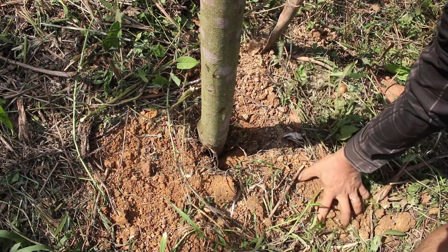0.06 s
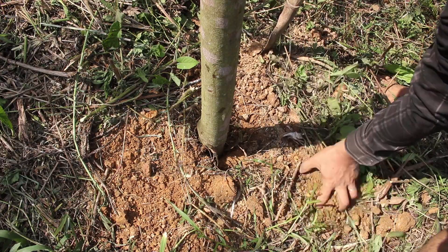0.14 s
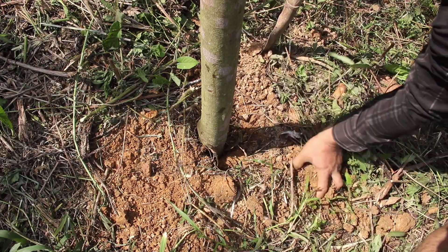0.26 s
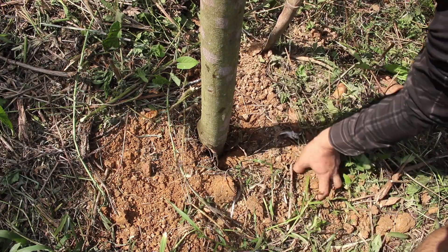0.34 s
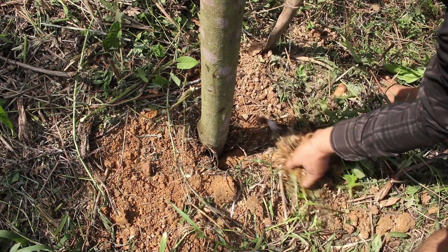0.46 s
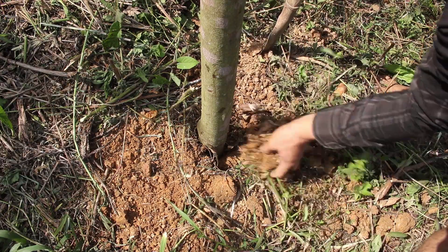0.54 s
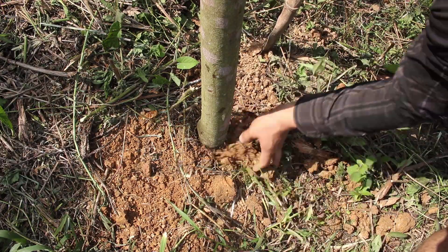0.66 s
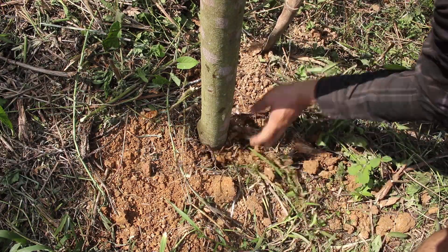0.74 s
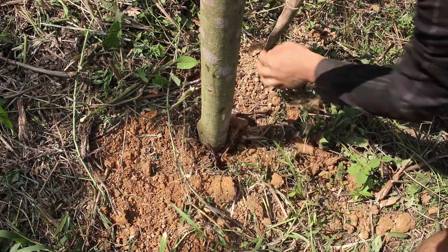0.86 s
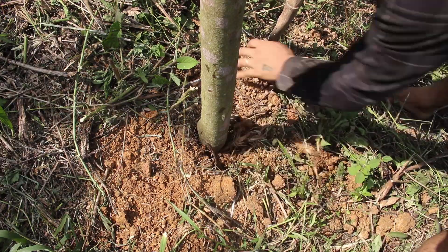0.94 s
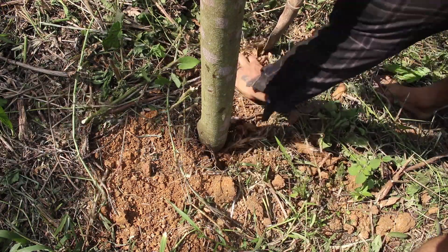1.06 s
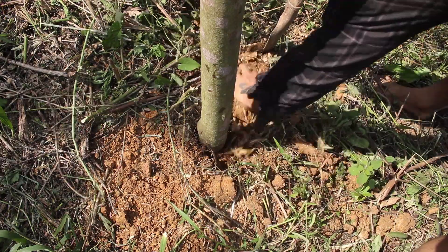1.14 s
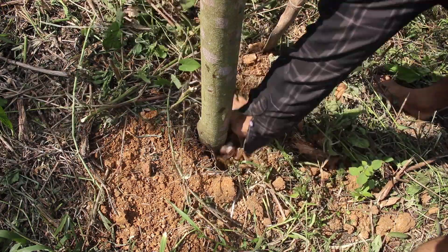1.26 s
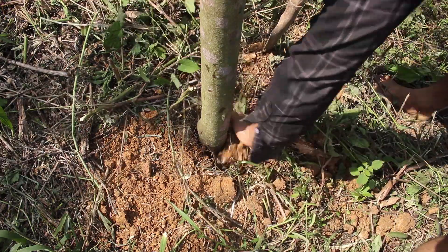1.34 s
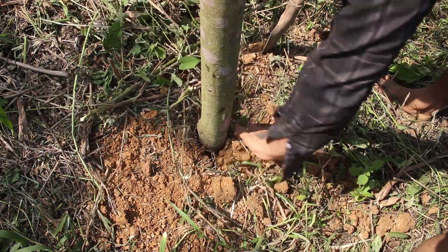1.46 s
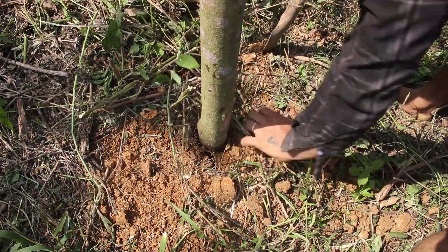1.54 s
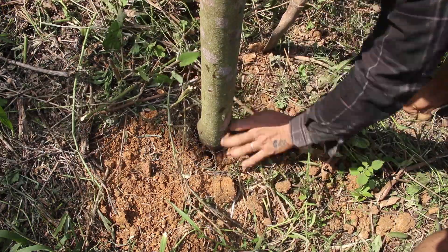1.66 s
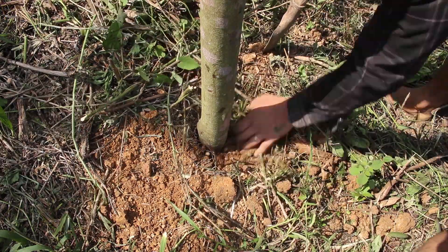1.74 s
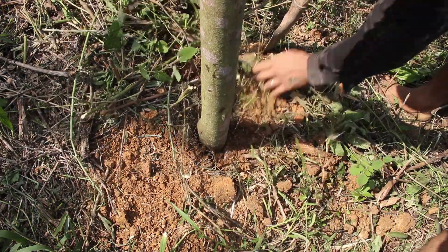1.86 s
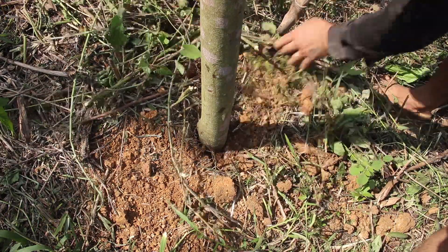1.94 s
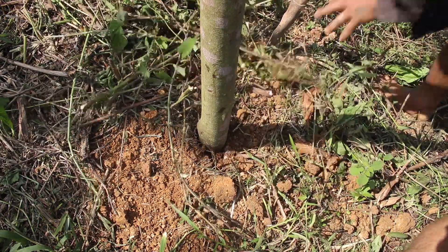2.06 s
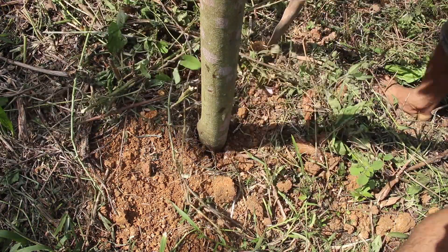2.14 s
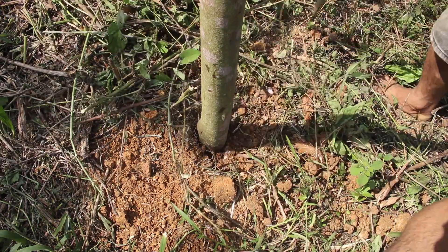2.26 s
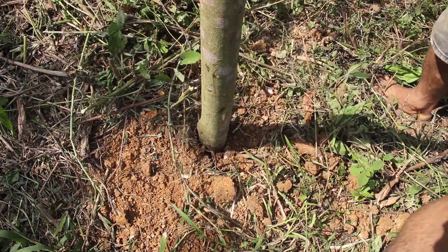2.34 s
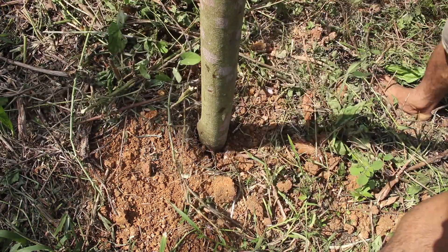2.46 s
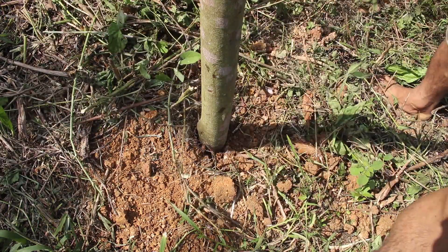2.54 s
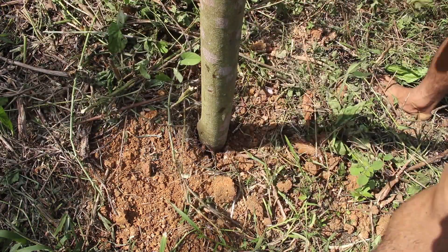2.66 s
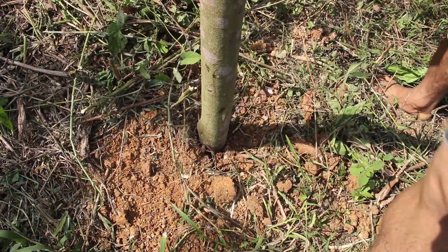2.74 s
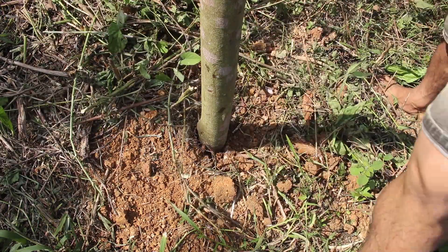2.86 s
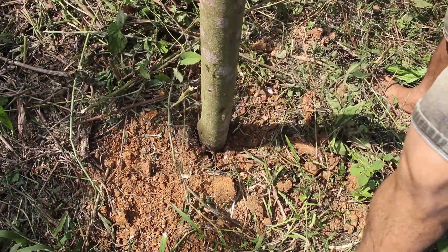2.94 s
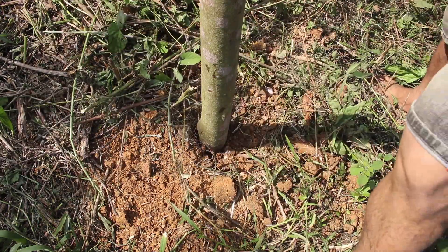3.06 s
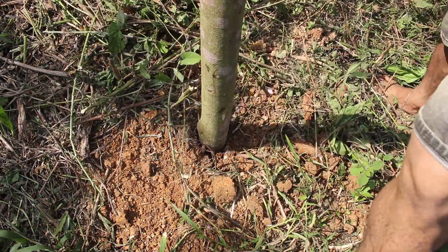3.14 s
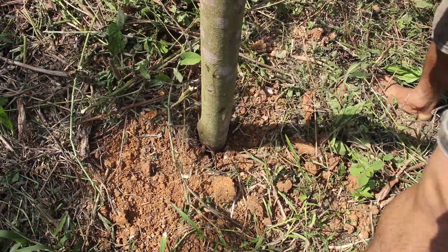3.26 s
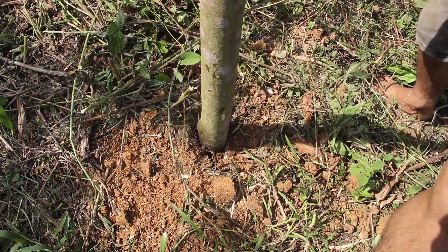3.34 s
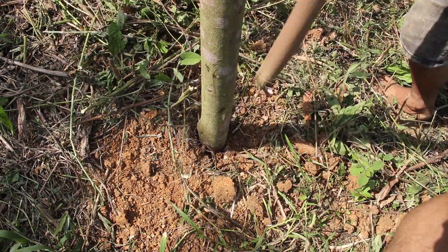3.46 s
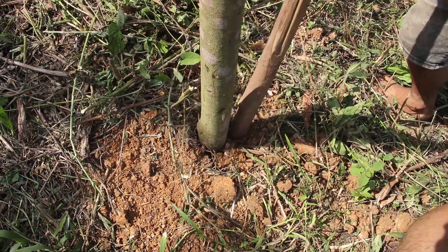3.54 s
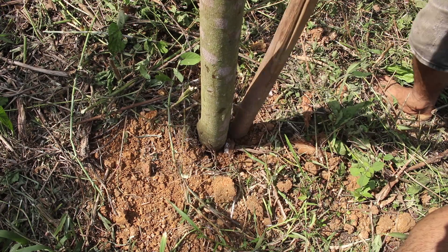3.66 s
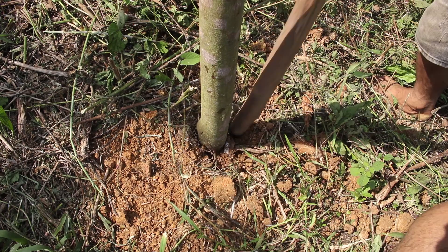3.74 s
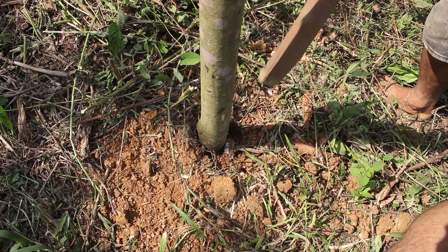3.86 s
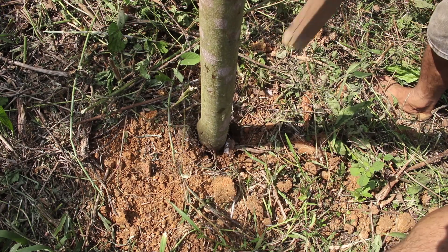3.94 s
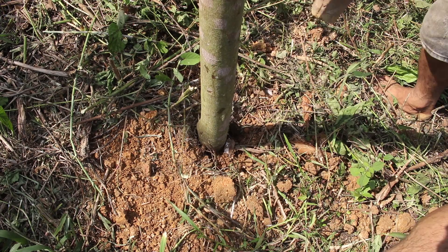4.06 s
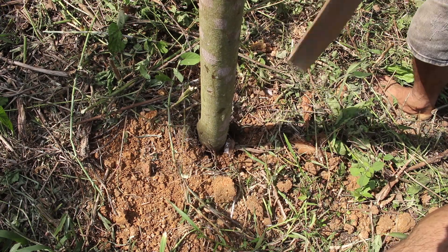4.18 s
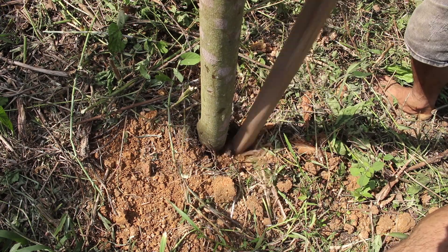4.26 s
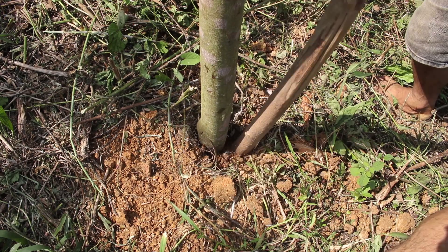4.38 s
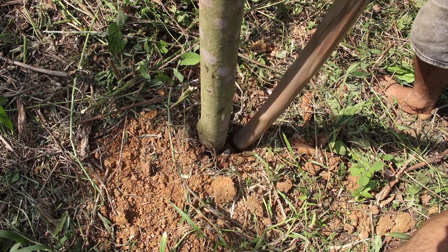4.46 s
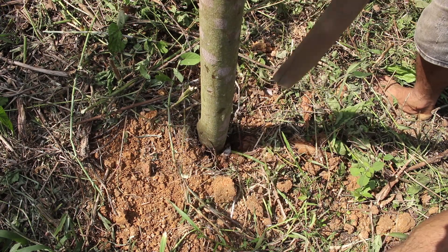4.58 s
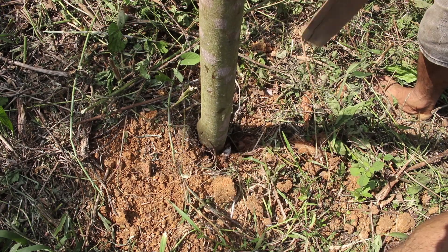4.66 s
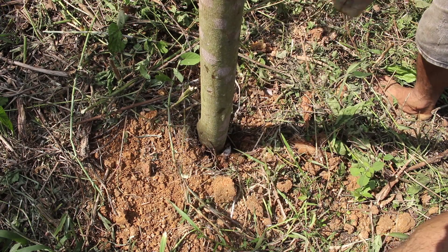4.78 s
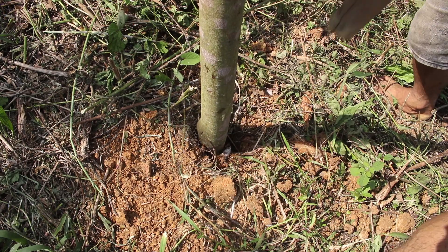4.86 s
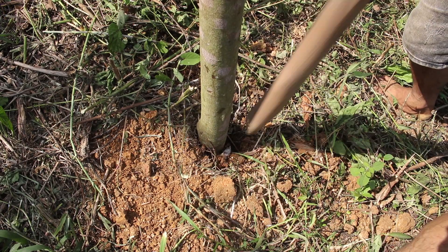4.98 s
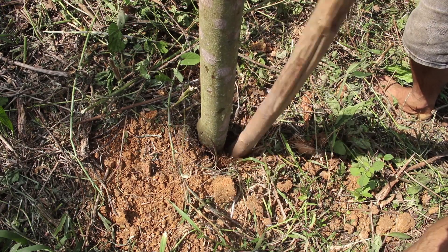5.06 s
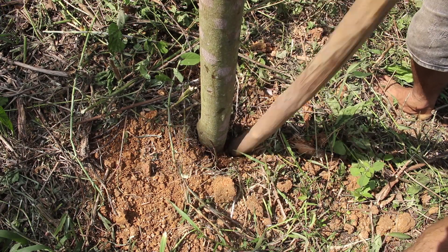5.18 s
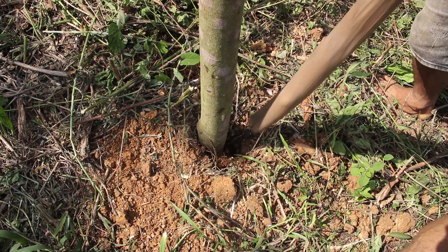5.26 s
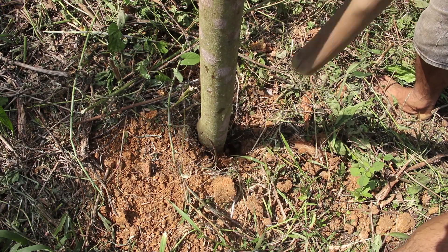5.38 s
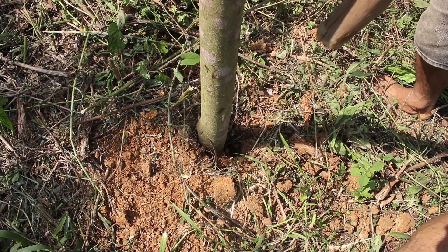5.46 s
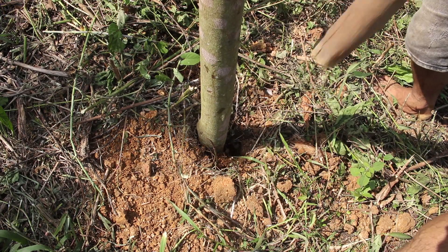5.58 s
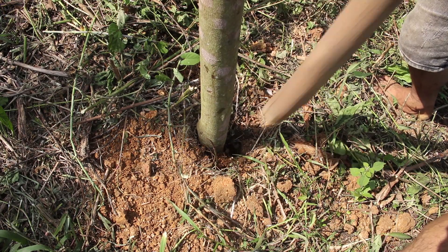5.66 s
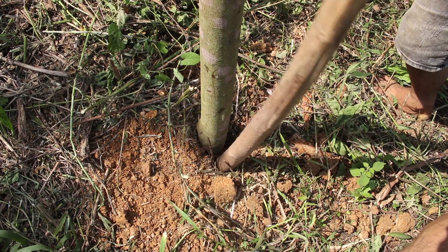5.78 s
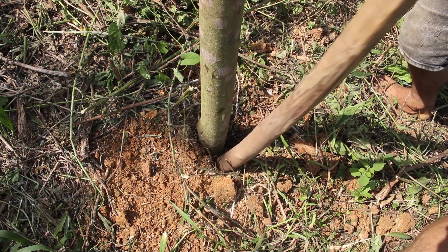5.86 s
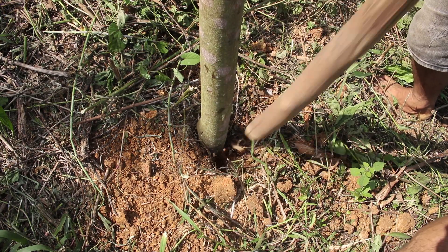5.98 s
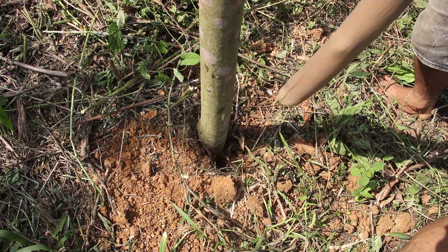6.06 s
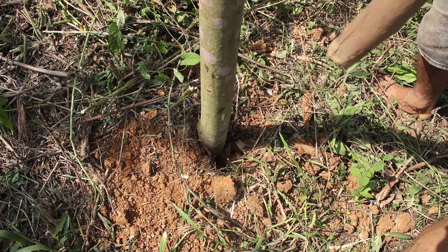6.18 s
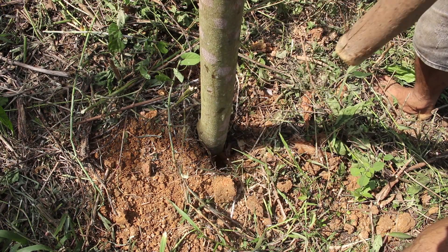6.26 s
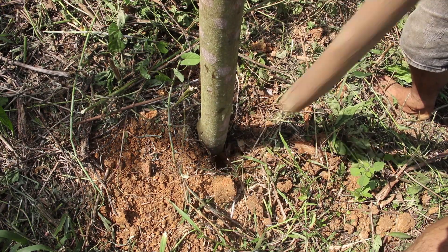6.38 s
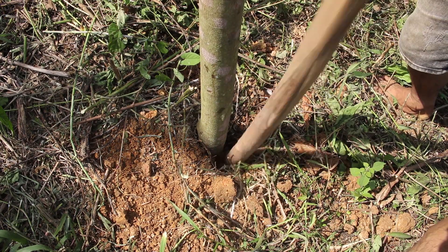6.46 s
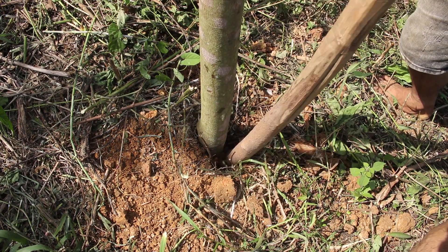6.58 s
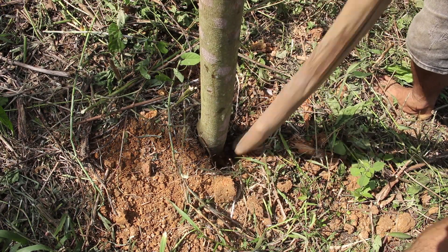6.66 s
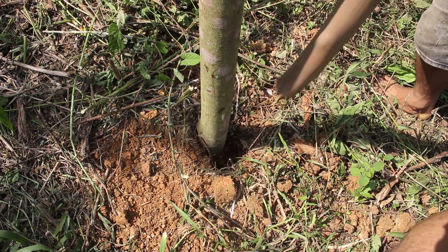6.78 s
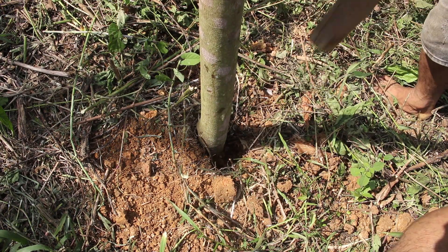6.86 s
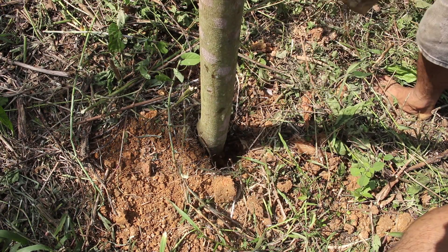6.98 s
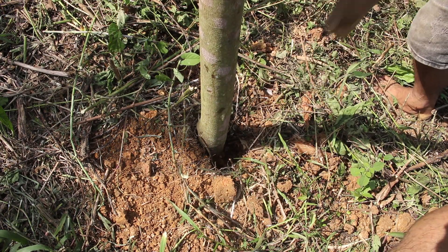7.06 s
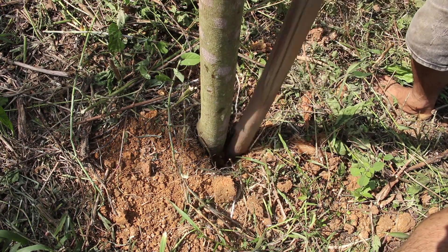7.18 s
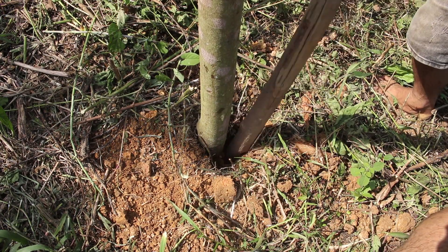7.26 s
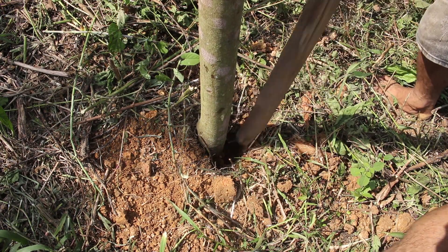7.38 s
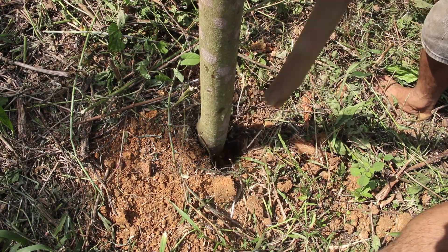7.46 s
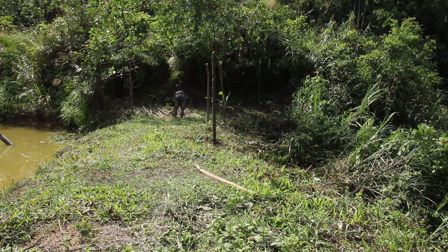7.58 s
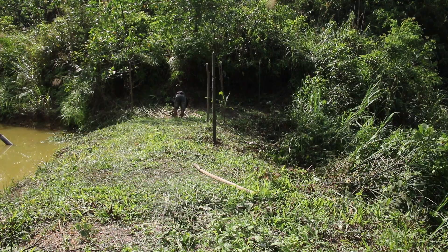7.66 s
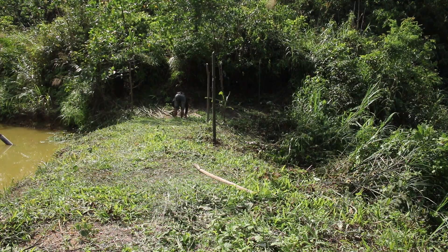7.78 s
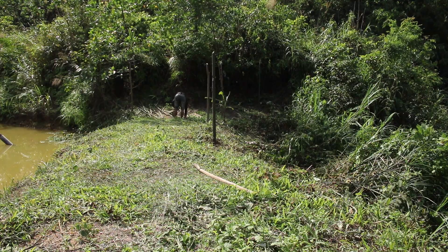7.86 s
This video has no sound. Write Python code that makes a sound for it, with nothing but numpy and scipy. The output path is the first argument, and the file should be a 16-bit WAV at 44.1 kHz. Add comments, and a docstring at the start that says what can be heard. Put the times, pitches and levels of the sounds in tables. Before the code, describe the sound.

Hands brush loose soil around a post, then a wooden pole rams the earth six times with gritty thuds, outdoors in light wind.

```python
"""A hand brushes loose soil round a post; clods and dry stalks snap, and a loose stick is knocked at 2.5 s.
A wooden pole is picked up and, from 3.6 s, rammed into the earth six times. Each blow crushes grit,
rings the pole and sends a slow thud through the ground; crumbs trickle as the pole is drawn out.
The stick is tapped once more at 7.6 s. Light wind and the hush of a field lie under it all."""
import sys
import numpy as np
from scipy import signal
from scipy.fft import rfft, irfft, next_fast_len
from scipy.io import wavfile
from scipy.ndimage import uniform_filter1d

SR = 44100
rng = np.random.default_rng(int(sys.argv[2]) if len(sys.argv) > 2 else 0)


def to_wav(sig):
    """Store sig (one row per channel, or 1-D mono) as 16-bit WAV at the path in sys.argv[1].

    Samples outside -1..1 are clipped; the rate is SR.
    """
    pcm = np.clip(np.atleast_2d(sig), -1, 1) * 32767
    pcm = np.round(pcm).astype(np.int16)
    wavfile.write(sys.argv[1], SR, pcm.T)  # frames by channels


N = 349712
HOP = 32  # samples per step of the soil envelopes

# pole blows: entry t/s, crush/s, rising share, grit/dB, grit tilt/dB, entry to peak strain/s, pole/dB,
# pole tilt/(dB/oct), scuff/dB, entry to stop/s, earth ring/dB, knock/dB, thud/dB, hum/dB
BLOWS = [(3.597, 0.025, 0.58, -36, 3, 0.01, -29.5, -4, -72.5, .013, -31, -24, -35, -39.5),
         (4.354, 0.029, 0.15, -37, 2.5, 0.011, -33.5, -1.5, -72, .019, -31.5, -31.5, -37.5, -46.5),
         (5.111, 0.025, 0.35, -35.5, 4, 0.0054, -23, -8.5, -64.5, 0.012, -20, -14.5, -31.5, -37),
         (5.816, 0.026, 0.47, -32.5, -0.5, 0.007, -26, -8, -62, .015, -21.5, -26.5, -35, -38),
         (6.548, 0.019, 0.82, -37.5, 1, 0.0096, -23.5, -5, -65, 0.01098, -29, -21.5, -30.5, -34.5),
         (7.271, 0.015, 0.4, -40, 8.5, 0.008, -24.5, -7, -61.5, 0.0095, -23, -32, -28.5, -36)]


def gain_of(db):
    return 10 ** (np.asarray(db) / 20)


def unit_rms(x):
    return x / np.sqrt(np.mean(x ** 2) + 1e-20)


def add(mix, start_s, sound):
    part = mix[round(start_s * SR):][:len(sound)]
    part += sound[:len(part)]


def coloured(x, spectrum):
    """Filters x by a spectrum of (f/Hz, level/dB)."""
    f, db = np.transpose(spectrum)
    size = next_fast_len(len(x) + 2048)
    hz = np.fft.rfftfreq(size, 1 / SR)
    response = gain_of(np.interp(np.log(hz + 1), np.log(f + 1), db))
    return irfft(rfft(x, size) * response, size)[:len(x)]


def noise(size, spectrum):
    return unit_rms(coloured(rng.standard_normal(size), spectrum))


def flutter(depth_db, window):
    """Random gain, smoothed over window samples."""
    return gain_of(depth_db * unit_rms(uniform_filter1d(rng.standard_normal(N), window)))


def grains(size, per_s, spread_db):
    """Random clicks, mostly small, a few large."""
    strength = gain_of(spread_db * np.minimum(rng.exponential(1, size), 5))
    return unit_rms(strength * rng.standard_normal(size) * (rng.random(size) < per_s / SR))


def blows():
    """The tip crushes grit and strains the pole until it stops; the stop starts the thud."""
    # crushed grit: f/Hz, level/dB
    grit_spectrum = [(120, -40), (200, -34), (1140, -3.5), (2090, -4), (2750, -9), (3190, -10),
                     (4270, -14.5), (9580, -16.5), (16000, -40)]
    out, t = np.zeros(N), np.arange(4000) / SR
    for start_s, crush_s, rise, grit_db, tilt_db, peak_s, pole_db, db_per_oct, *rest in BLOWS:
        _, stop_s, *thud_levels_db = rest
        push = np.interp(t, [0, crush_s * rise, crush_s], [.25, 1, .15])
        push *= np.exp(-np.maximum(t - crush_s, 0) / .0043)
        spray = .017 * np.exp(-t / .041)  # thrown crumbs land
        grit = coloured(grains(len(t), per_s=14000, spread_db=2.5), grit_spectrum)
        grit = unit_rms(coloured(grit, [(2000, -tilt_db), (10000, tilt_db)]))
        add(out, start_s, gain_of(grit_db) * (push ** .9 + spray) * grit)
        strain = np.exp(np.minimum((t - peak_s) / .0026, (peak_s - t) / .0043)) + .1 * push
        ring = pole(strain * rng.standard_normal(len(t)), db_per_oct, damping=2.72)
        ring *= np.linalg.norm(strain) / np.linalg.norm(ring)  # all the strain goes into the ring
        add(out, start_s, gain_of(pole_db) * ring)
        add(out, start_s + stop_s, thud(*thud_levels_db))
    return out


def pole(force, db_per_oct, damping):
    """The pole's modes ring; hands and soil widen them, a hard contact favours the high ones."""
    # wooden pole: f/Hz, width before damping/Hz, level/dB
    modes = [(672, 36, 3), (1014, 71, 11.5), (1292, 59, 11.5), (2240, 50, -38), (2340, 29, 1),
             (2660, 57, 0), (2975, 51, 1), (3350, 34, -20), (3630, 165, 3), (4080, 250, -5),
             (4560, 44, -17)]
    t = np.arange(3000) / SR
    ring = sum(gain_of(db + db_per_oct * np.log2(hz / 1200)) * width_hz
               * np.exp(-np.pi * width_hz * damping * t) * np.sin(2 * np.pi * hz * t)
               for hz, width_hz, db in modes)
    return signal.oaconvolve(force, ring / np.linalg.norm(ring))[:len(force)]


def thud(ring_db, knock_db, thud_db, hum_db):
    """A ground wave falls in pitch as its highs arrive first; earth settles and rings, the ground hums."""
    # packed earth under the tip: f/Hz, level/dB, t60/s, delay/s
    earth_modes = [(354, 1.5, 0.038, 0.00057), (597, 1.5, 0.0071, 0.00023)]
    # slow hum of post and ground: f/Hz, level/dB, t60/s, delay/s
    hum_modes = [(178, -4.5, 0.1, .012), (92, -12.5, 0.16, 0.0278), (53.4, 4, 0.15, 0.015),
                 (36.4, -11.5, 0.64, 0.015)]
    high_hz, low_hz, glide_s = 280, 50, .01
    crest_s, width_s = .016, .0065
    t = np.arange(SR // 2) / SR
    cycles = low_hz * t + (high_hz - low_hz) * glide_s * (1 - np.exp(-t / glide_s))
    knock = gain_of(knock_db - 60 * t / .027)
    swell = gain_of(thud_db) * np.exp(-.5 * ((t - crest_s) / width_s) ** 2)
    wave = (knock + swell) * np.sin(2 * np.pi * cycles)
    settling = noise(len(t), [(40, -29), (110, -7), (300, 7.5), (800, -27)])
    settling *= gain_of(thud_db - 10 - 60 * t / .095) * (1 - np.exp(-t / .003))
    ring = gain_of(ring_db) * swings(t, earth_modes)
    hum = gain_of(hum_db) * swings(t, hum_modes)
    return wave + settling + ring + hum


def swings(t, modes):
    """Damped swings that arrive late and swell over a quarter cycle."""
    out = np.zeros(len(t))
    for hz, db, t60_s, delay_s in modes:
        age_s = np.maximum(t - delay_s, 0)
        envelope = gain_of(db - 60 * age_s / t60_s) * (1 - np.exp(-4 * hz * age_s))
        out -= envelope * np.sin(2 * np.pi * hz * age_s)
    return out


def snaps():
    """Clods and stalks snap: a pitched click of about a millisecond, then the pole rings."""
    # snaps: t/s, click peak/dB, f/Hz, pole ring re click/dB
    breaks = [(0.0439, -29, 5500, -5.5), (.302, -40.5, 1790, -3.5), (.311, -48, 2000, -5),
              (.533, -43, 9150, -6), (.727, -53, 3060, -2), (1.048, -53, 5260, -14),
              (1.142, -45.5, 7900, -16), (1.674, -49, 3976, -5), (1.988, -39, 7000, -11),
              (2.463, -36.5, 6300, -6), (2.518, -43.5, 1470, -1), (2.546, -49, 7500, -21),
              (2.556, -47, 8700, -9), (2.630, -49.5, 7600, -10), (2.693, -46, 6750, -5.5),
              (2.715, -51, 8950, -9), (3.105, -57, 3050, -3), (3.6045, -23.5, 9000, -28),
              (3.6115, -20.5, 6100, -8), (4.112, -55, 8000, -13), (4.3572, -32, 8640, 3),
              (4.372, -27, 3660, -2), (4.401, -49, 7000, -18), (5.819, -14.5, 4300, -8),
              (5.830, -20.5, 3280, -7), (5.859, -47, 3600, -9), (6.004, -40.5, 3630, -9),
              (6.557, -18.5, 3420, -2), (6.680, -37, 1450, -1.5), (7.277, -36, 9600, -18),
              (7.469, -45.5, 3450, -2.5)]
    out, t = np.zeros(N), np.arange(3000) / SR
    for start_s, db, hz, ring_db in breaks:
        burst = rng.choice([-1., 1.], len(t)) * (np.exp(-t / .00069) + .029 * np.exp(-t / .0046))
        spectrum = [(hz / 12, -50), (hz / 4, -26), (hz / 1.6, -7), (hz, 0), (hz * 1.5, -10), (hz * 3, -36)]
        click = coloured(burst, spectrum)
        buried = any(0 < start_s - blow[0] < .05 for blow in BLOWS)
        ring = pole(burst, db_per_oct=-1.5, damping=1.6 if buried else .9)
        ring = coloured(ring, [(200, -10.5), (700, -10)])
        snap = click / abs(click).max() + gain_of(ring_db) * ring / abs(ring).max()
        add(out, start_s, gain_of(db) * snap)
    return out


def soil():
    """Three grain sizes slide in bunches; single grains break out, and some rasp along the pole."""
    # fine sand: f/Hz, level/dB
    sand = [(1290, -36), (2200, -7.5), (4460, -1), (5530, -1), (6010, -0.5), (8030, 1.5), (15100, -8),
            (16000, -7.5)]
    # crumbs: f/Hz, level/dB
    crumbs = [(240, -38), (400, -5), (570, -3.5), (969, -1.5), (1570, -3.5), (2290, -10.5), (3000, -12.5),
              (3900, -12.5), (6600, -120)]
    # clods: f/Hz, level/dB
    clods = [(65, -15.5), (110, -4.5), (124, -6.5), (264, -0.5), (532, -8), (650, -13.5), (840, -54),
             (1430, -120)]
    *gains, rasp_gain = soil_movement()
    catches = grains(N, per_s=2700, spread_db=4.8)
    out = rasp_gain * unit_rms(pole(catches, db_per_oct=-1.8, damping=1.1))
    bunches = flutter(depth_db=1.74, window=300)
    sizes = [(sand, 400, .7, .0007), (crumbs, 200, .5, .002), (clods, 60, .25, .005)]
    for gain, (spectrum, per_band_per_s, share, decay_s) in zip(gains, sizes):
        singles = crackles(spectrum, per_band_per_s, decay_s)
        stream = noise(N, spectrum)
        out += gain * unit_rms(bunches * (stream + share * singles))
    return out


def crackles(spectrum, per_band_per_s, decay_s):
    """Single grains: short noise bursts, each in one of four bands of the spectrum."""
    centres_hz = np.geomspace(spectrum[1][0], spectrum[-2][0], 4)
    skirt = (centres_hz[1] / centres_hz[0]) ** 2
    decay = [1, -np.exp(-1 / (decay_s * SR))]
    out = np.zeros(N)
    for hz in centres_hz:
        hiss = rng.standard_normal(N)
        envelope = signal.lfilter([1], decay, abs(grains(N, per_band_per_s, spread_db=2.5)))
        out += coloured(hiss * envelope, [(hz / skirt, -20), (hz, 0), (hz * skirt, -20)])
    return unit_rms(coloured(out, spectrum))


def soil_movement():
    """Hand and pole move the soil: gains of sand, crumbs, clods and pole rasp over time."""
    # hand sweeps: peak t/s, swell/s, fade/s, sand/dB, crumbs re sand/dB
    sweeps = [(0.041, 0.1, 0.02, -48.5, -3.5), (.21, 0.04, 0.37, -61, -1.5), (.3, 0.14, 0.096, -58.5, 2),
              (.46, 0.1, 0.34, -68, 3), (.57, 0.16, 0.24, -61.5, -1.5), (0.711, 0.021, 0.19, -63, 0.5),
              (.84, .1, 0.34, -71.5, -2), (1.11, 0.11, 0.08, -62.5, -1), (1.311, 0.19, 0.29, -54.5, -1.5),
              (1.6, 0.024, 0.013, -58, -3), (1.67, .03, 0.17, -64.5, 1), (1.95, .18, 0.34, -55.5, -2.5),
              (2.495, 0.033, 0.032, -64, 0), (2.54, 0.048, 0.11, -62.5, -5.5),
              (2.67, 0.11, 0.021, -71.5, -2), (2.694, 0.0039, 0.015, -64.5, 10.5),
              (2.74, 0.063, 0.81, -73.5, 0), (3.21, 0.088, 0.066, -75.5, -4)]
    # pole drawn out: peak t/s, swell/s, fade/s, sand/dB, crumbs re sand/dB, hold/s, rasp/dB
    pulls = [(3.768, 0.11, 0.19, -68.5, 0.5, 0.027, -71.5), (4.501, 0.079, 0.11, -67, 2, 0.019, -66),
             (5.24, 0.033, 0.081, -60.5, 0.5, 0.017, -70), (5.94, .03, 0.12, -75.5, 9.5, .06, -72),
             (6.678, .05, 0.15, -77.5, 3.5, 0.046, -70), (7.399, 0.019, 0.11, -71, 3.5, 0.05, -68)]
    # faint low murmur and rustle: t/s, low band/dB, middle band/dB
    murmur = [(0, -82, -86), (2.1, -77, -87), (2.322, -69.5, -76), (2.5, -76, -90), (2.9, -90, -80),
              (3.078, -72.5, -82.5), (3.3, -77, -90), (3.55, -74, -80), (4.0, -83, -77), (4.3, -84, -79.5),
              (4.65, -73.5, -72), (4.95, -72, -75.5), (5.08, -66.5, -70), (5.3, -75.5, -77),
              (6.2, -88.5, -91), (6.5, -78, -78), (6.85, -76, -76), (7.18, -78, -85.5), (7.56, -76.5, -81),
              (7.6, -62.5, -79), (7.67, -68.5, -80), (7.75, -76, -78), (7.93, -77, -78)]
    trickle_s, trickle_db, settle_s, settle_db = .24, -18, .081, -62
    t = np.arange(0, N, HOP) / SR
    murmur_s, *murmur_db = np.transpose(murmur)
    low, middle = (gain_of(np.interp(t, murmur_s, db)) ** 2 for db in murmur_db)
    power = np.array([0 * t, middle, low, 0 * t])
    for peak_s, swell_s, fade_s, sand_db, crumbs_db in sweeps:
        levels_db = sand_db + np.array([0, crumbs_db, crumbs_db - 12.5])
        power[:3] += slide(t - peak_s, swell_s, fade_s, levels_db)
        power[:3] += slide(t - peak_s, swell_s, trickle_s, levels_db + trickle_db)  # soil runs on
    for peak_s, swell_s, fade_s, sand_db, crumbs_db, hold_s, rasp_db in pulls:
        levels_db = [sand_db, sand_db + crumbs_db, sand_db + crumbs_db - 10.5, rasp_db]
        power += slide(t - peak_s, swell_s, fade_s, levels_db, hold_s)
    for blow in BLOWS:  # the tip scuffs coming down; loosened soil slides back after the stop
        start_s, scuff_db, stop_s = blow[0], blow[8], blow[9]
        power[:3] += slide(t - start_s, .041, .01, scuff_db + np.array([-2, 0, .5]))
        power[:3] += slide(t - start_s - stop_s, .002, settle_s, settle_db + np.array([-5, 0, 1.5]))
    return [np.interp(np.arange(N) / SR, t, np.sqrt(p)) for p in power]


def slide(t, swell_s, fade_s, levels_db, hold_s=0):
    """Power per layer of one soil movement that swells until t = 0, holds and fades."""
    drop_db = 15.5 * np.maximum(-t / swell_s, np.maximum(t - hold_s, 0) / fade_s)
    return gain_of(np.reshape(levels_db, (-1, 1)) - drop_db) ** 2


def stick():
    """A short rattle of contact rings the modes of a loose dry stick."""
    # knocks on the stick: t/s, peak/dB, tilt/(dB/oct)
    taps = [(2.4625, -31.5, 2), (2.518, -41, -0.5), (2.526, -47.5, 0.5), (7.598, -54, -26)]
    # dry stick: f/Hz, level/dB, t60/s
    modes = [(400, -1.5, 0.15), (716, 3, 0.095), (1323, -4, 0.043), (1560, -2.5, 0.026),
             (2410, -1.5, 0.035), (2680, -10, 0.061), (3380, -11, 0.038), (4040, -2, 0.043),
             (4180, -3, 0.03), (4990, -1, 0.044), (5900, 0, 0.029)]
    out, t = np.zeros(N), np.arange(4000) / SR
    for start_s, peak_db, db_per_oct in taps:
        contact = rng.standard_normal(150) * np.exp(-np.arange(150) / 9)
        ring = sum(gain_of(db + db_per_oct * np.log2(hz / 1200) - 60 * t / t60_s)
                   * np.sin(2 * np.pi * hz * t) for hz, db, t60_s in modes)
        tap = signal.oaconvolve(ring, contact)
        add(out, start_s, gain_of(peak_db) * tap / abs(tap).max())
    return out


def air():
    """Wind rumbles in lumps over the steady hush of the field."""
    # wind strength: t/s, level/dB
    gusts = [(0.0, -66.5), (1.4, -69), (2.0, -64), (3.82, -65.5), (4.131, -71.5), (4.53, -66), (5.3, -71),
             (6.0, -66), (6.3, -68.5), (6.7, -62), (7.0, -68.5), (7.93, -63.5)]
    # wind rumble: f/Hz, level/dB
    rumble_spectrum = [(8.8, -39), (15, -3.5), (54, 9.5), (67, 1.5), (81, -20), (110, -33), (140, -57),
                       (240, -120)]
    # field hush: f/Hz, level/dB
    hush_spectrum = [(53, -28.5), (90, -20.5), (103, 3.5), (210, -7.5), (393, -4.5), (556, -12.5),
                     (876, -11), (2830, -20), (12100, -23.5), (15000, -32), (16000, -27.5)]
    gust_s, gust_db = np.transpose(gusts)
    strength = gain_of(np.interp(np.arange(N) / SR, gust_s, gust_db))
    rumble = unit_rms(flutter(depth_db=1.3, window=4000) * noise(N, rumble_spectrum))
    return strength * rumble + gain_of(-72) * noise(N, hush_spectrum)


def side_hiss():
    """Faint hiss that sets left and right apart."""
    # hiss: f/Hz, level/dB
    spectrum = [(18, -24), (30, -5.5), (266, -8.5), (303, -7.5), (336, -7), (404, -12.5), (7670, -16),
                (16000, -18.5)]
    return gain_of(-79.5) * noise(N, spectrum)


def scene():
    mid = blows() + snaps() + stick() + soil() + air()
    side = side_hiss()
    return np.array([mid + side, mid - side])


def record(dry):
    """Low-pass at 15.9 kHz."""
    lowpass = signal.firwin(511, 15900, window=("kaiser", 9), fs=SR)
    return signal.oaconvolve(dry, lowpass[None], "same")


dry = scene()
out = record(dry)
to_wav(out)
```